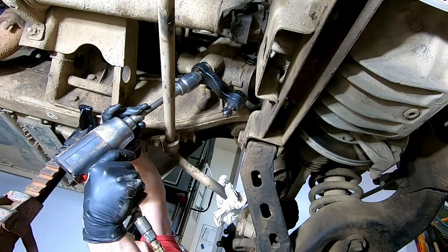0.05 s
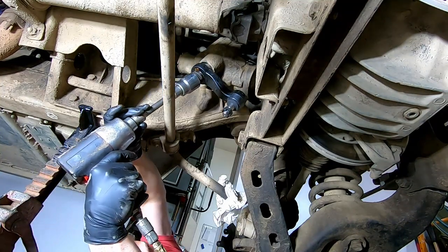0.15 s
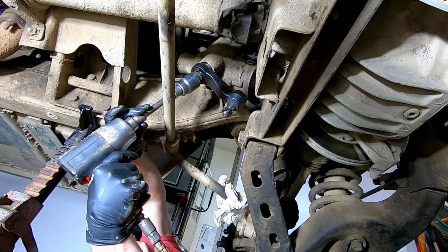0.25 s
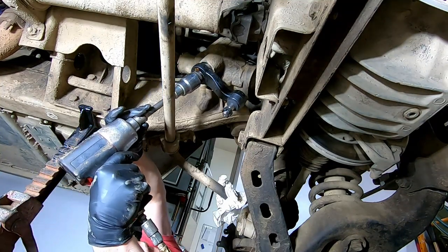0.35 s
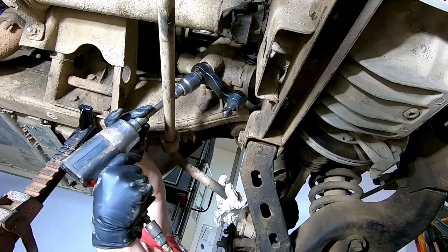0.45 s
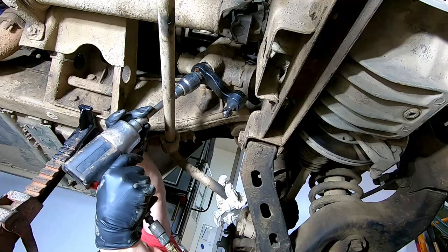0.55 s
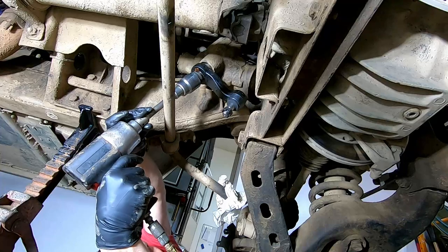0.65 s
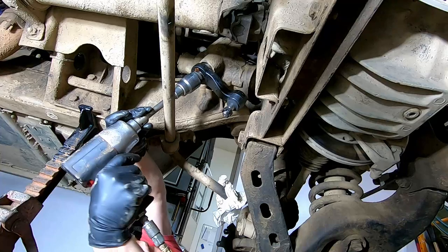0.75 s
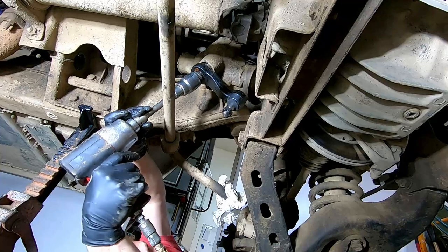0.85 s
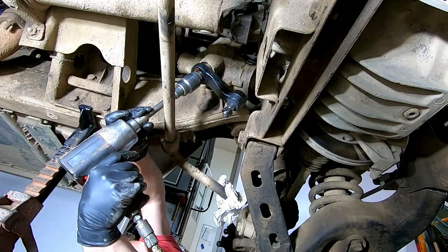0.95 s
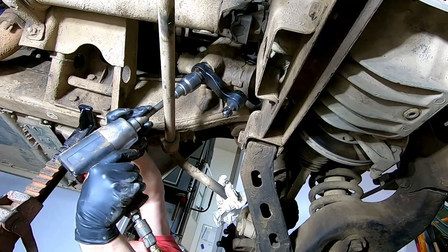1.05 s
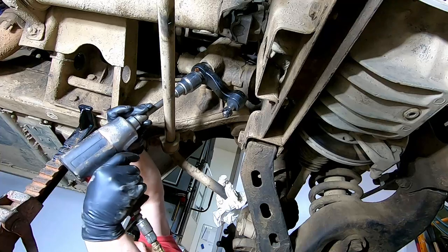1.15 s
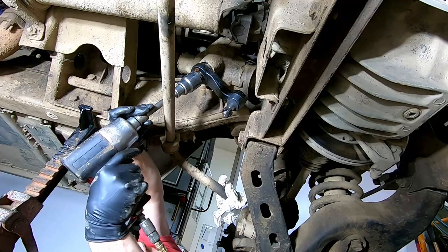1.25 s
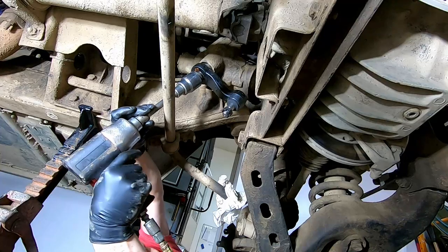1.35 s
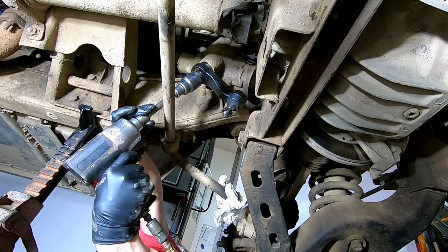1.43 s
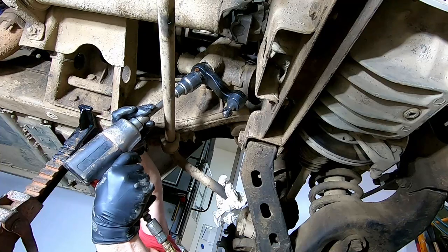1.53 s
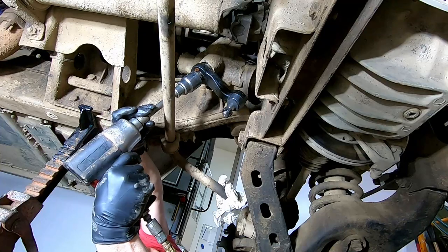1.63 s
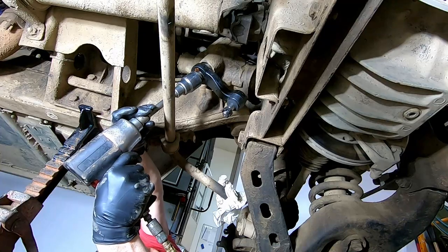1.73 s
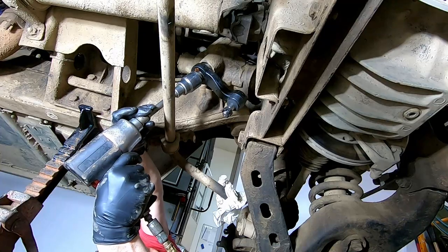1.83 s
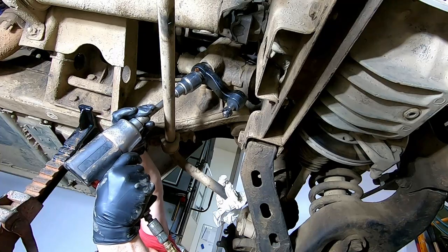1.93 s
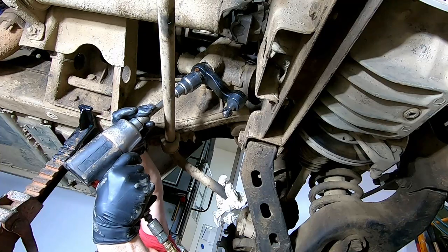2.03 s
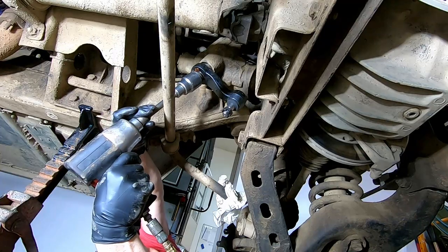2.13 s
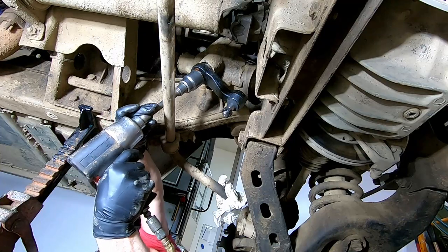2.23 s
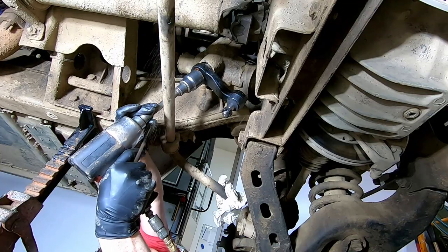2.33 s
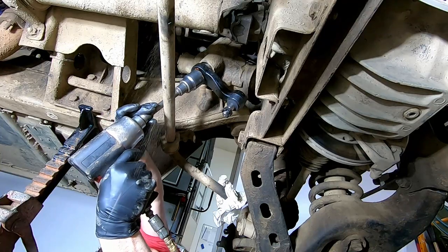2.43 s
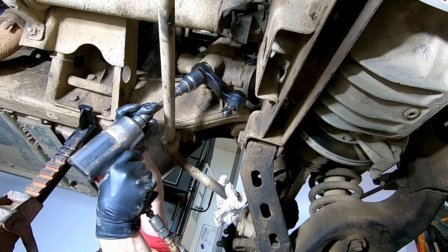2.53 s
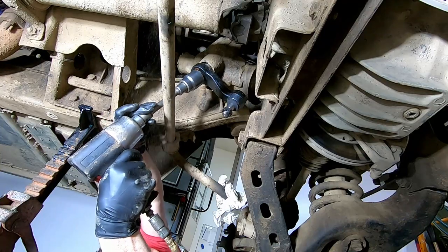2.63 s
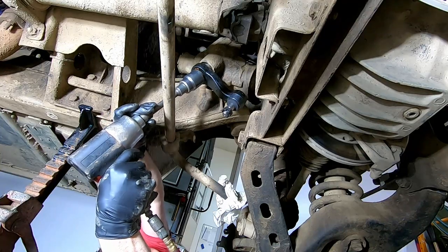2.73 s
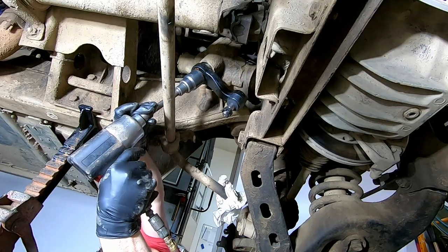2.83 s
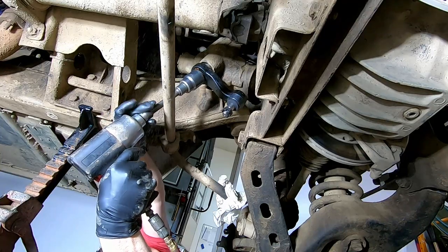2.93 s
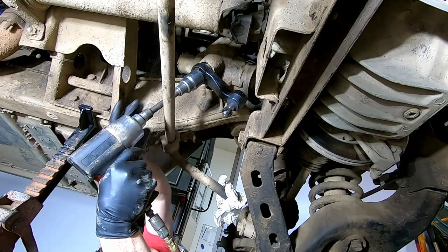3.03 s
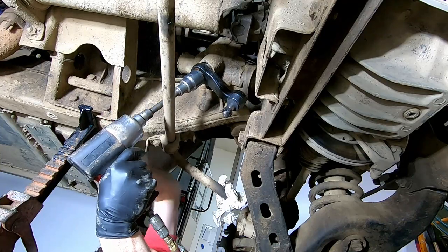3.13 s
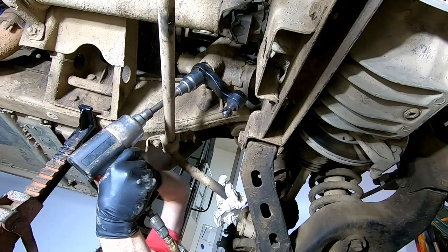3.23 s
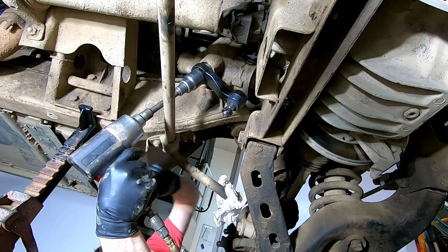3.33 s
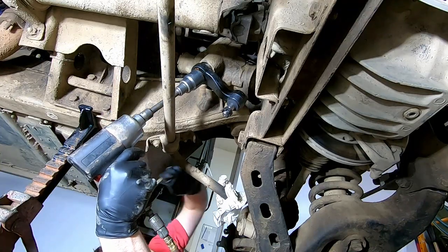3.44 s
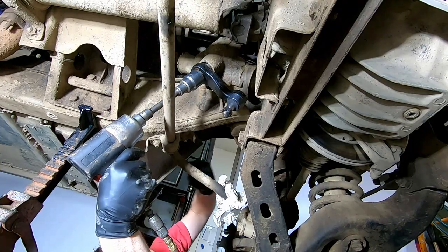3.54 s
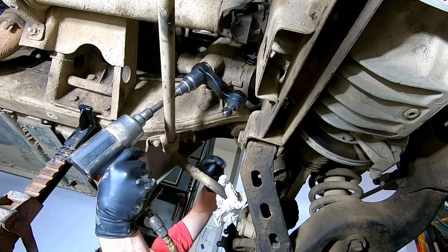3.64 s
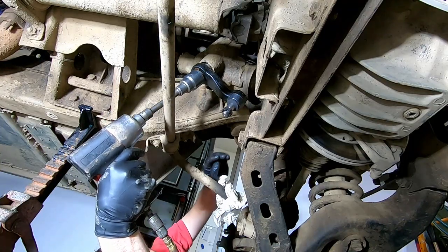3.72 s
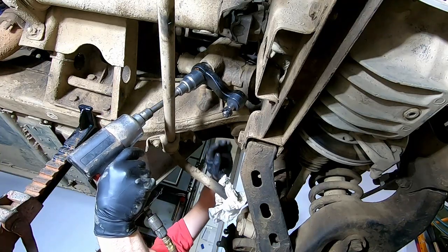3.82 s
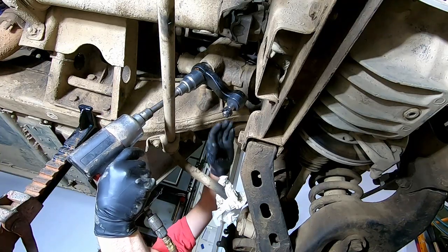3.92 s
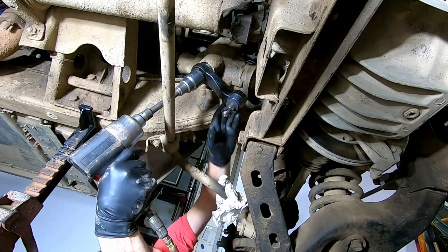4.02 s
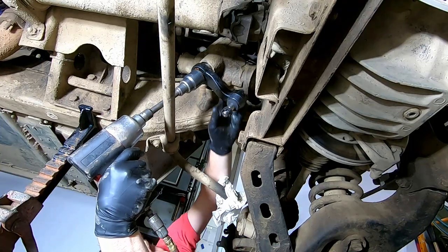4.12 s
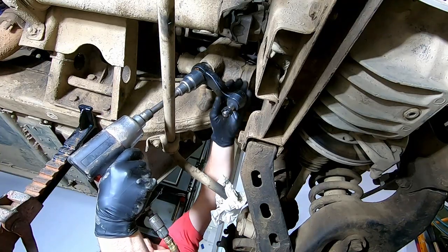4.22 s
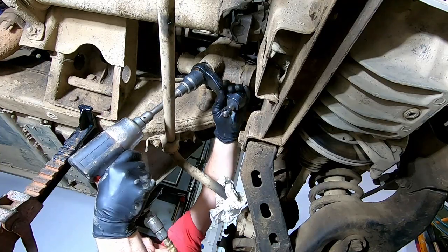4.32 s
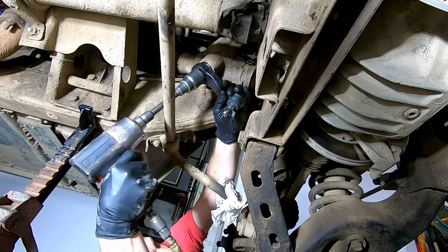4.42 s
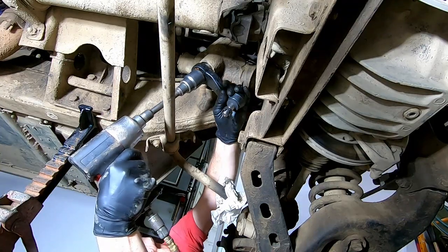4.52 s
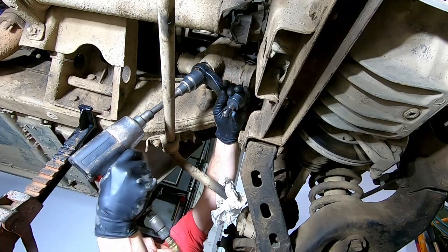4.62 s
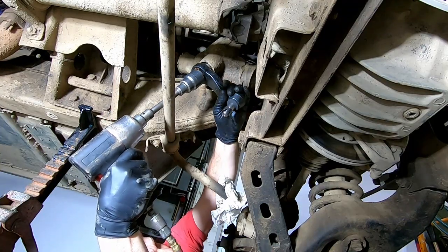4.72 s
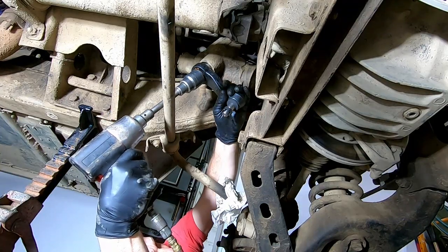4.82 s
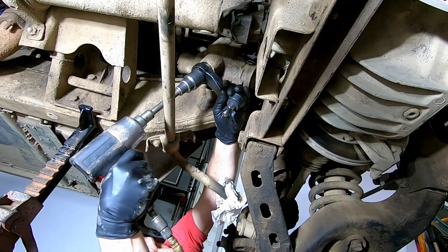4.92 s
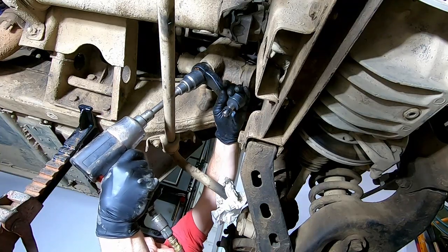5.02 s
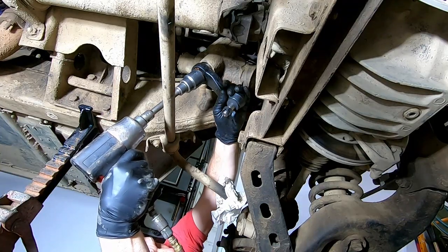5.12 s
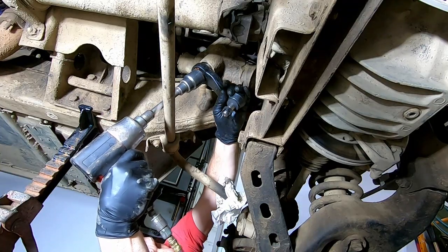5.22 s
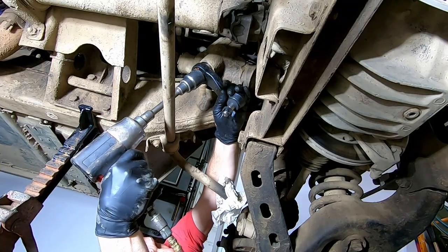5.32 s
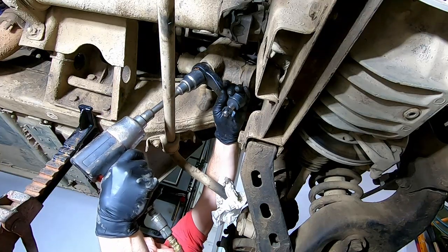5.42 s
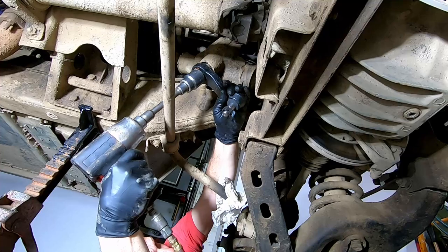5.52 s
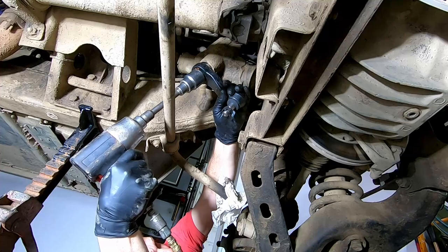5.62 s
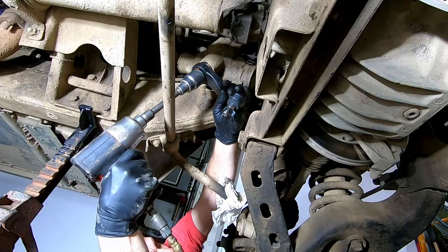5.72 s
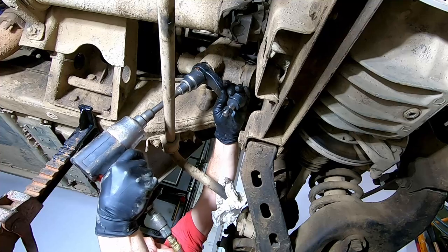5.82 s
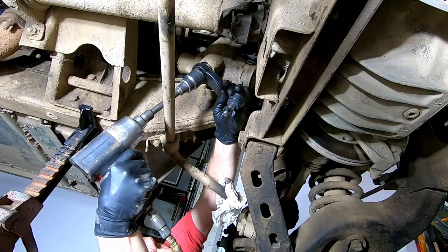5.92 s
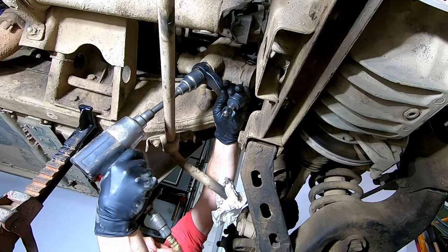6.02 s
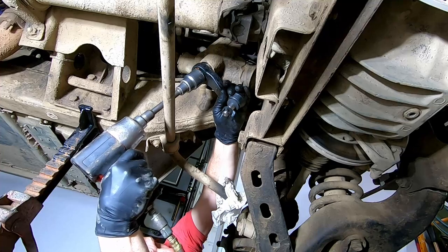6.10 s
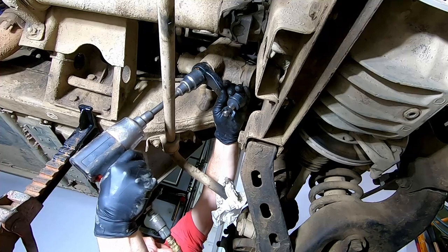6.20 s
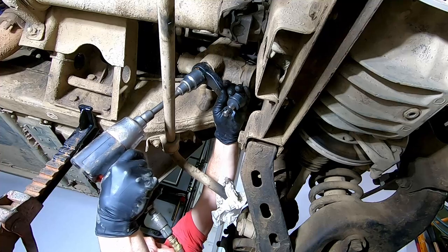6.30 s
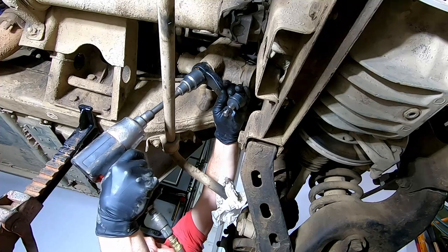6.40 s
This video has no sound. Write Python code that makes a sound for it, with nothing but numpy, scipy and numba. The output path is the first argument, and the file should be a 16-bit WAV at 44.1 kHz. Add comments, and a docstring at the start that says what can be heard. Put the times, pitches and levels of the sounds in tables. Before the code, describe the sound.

A phone close under a vehicle in a live workshop picks up a steady, bright hiss from an air hose coupling over a faint low murmur. From 0 to 1.5 s, extra air seeps from the trigger while gloves and hose rub and rustle in short bumps, with light steel taps near 0.1, 0.5 and 0.65 s. Around 1.6 s the valve whistles and the air impact wrench gives a weak puff with two loose clanks. A second pull builds from clunks at 2.0 s to hard rapid blows by 2.2 s; a third snaps out at 2.6-2.8 s. The reverberation fades and the hiss creeps up again, with a tiny tap at 3.65 s. At 4.25 s a whistle opens a long run: rough air roar, low rumble, exhaust thumps and ringing steel cracks, about thirteen a second, still hammering at the end near 6.45 s.

```python
"""In a workshop, an air impact wrench works a nut under a truck, close to a phone; its hose coupling hisses.
After some rubbing and rustling come three short pulls of the trigger, then a long one.
Coloured noise makes the air, rumble and rubbing; fading sine waves make the ringing steel and exhaust thumps.
The chassis and workshop smear the sound, and the phone's automatic gain creeps back up in the quiet."""
import sys
import numpy as np
from scipy import signal
from scipy.fft import rfft, irfft, next_fast_len
from scipy.io import wavfile
from scipy.ndimage import uniform_filter1d
from numba import njit

SR = 44100
rng = np.random.default_rng(int(sys.argv[2]) if len(sys.argv) > 2 else 0)


def waveform_to_disk(signal):
    """Save audio, clipped to [-1, 1], as 16-bit WAV at the path in sys.argv[1]."""
    frames = np.transpose(np.atleast_2d(signal))
    scaled = np.clip(frames, -1, 1) * 32767
    samples = np.round(scaled).astype(np.int16)
    wavfile.write(sys.argv[1], SR, samples)


N = 284886  # length of the scene in samples

# Hiss of the leaking coupling. Each row: frequency in Hz, relative level in dB.
LEAK_SPECTRUM = [(240, -77), (400, -25), (527, -35), (1340, -19.5), (1740, -22), (2060, -13.5), (2840, -7),
                 (3210, -16), (3580, -7), (4110, -15), (4860, -8.5), (5750, -10), (7470, -3.5),
                 (9840, -11.5), (15600, -23)]
# Narrow resonances of the coupling. Each row: frequency in Hz, width in Hz, lift in dB.
COUPLING_RINGS = [(3900, 60, 3.3), (6630, 40, 12), (7470, 84, 2.7), (7700, 90, 4), (9600, 300, 10),
                  (10080, 140, 14)]
# Low murmur of the workshop. Each row: frequency in Hz, relative level in dB.
SHOP_SPECTRUM = [(18, -75), (30, -48), (106, -11.5), (142, -15), (188, 0.5), (265, -1.5), (337, -7),
                 (372, -33), (900, -54), (1170, -70.5), (1980, -120)]
LEAK_DB, SHOP_DB = -47.5, -65.5

# Air seeping past the half-pressed trigger. Each row: frequency in Hz, relative level in dB.
SEEP_SPECTRUM = [(600, -37), (1000, -15), (1800, -10.5), (2600, -0.5), (3600, -5), (4600, -7),
                 (5400, -12.5), (6500, -4), (8000, -5), (12000, -23)]
# Resonances of the seeping air. Each row: frequency in Hz, width in Hz, lift in dB.
SEEP_RINGS = [(750, 41, 23), (1900, 50, 7.8), (2370, 47, 11), (2695, 39, 10.3), (2940, 55, 7.2),
              (5450, 100, 11), (6300, 140, 3.3)]
SEEP_DB, SEEP_END_S = -49.5, 1.8

# Gloves and hose shifting on the frame. Each row: peak in seconds, rub level in dB, rustle level in dB.
HANDLING = [(.05, -61, -56.5), (.176, -55, -67), (.478, -51, -55), (.664, -48.5, -66), (.85, -76, -71),
            (.992, -73, -63.5), (1.118, -53, -59.5), (1.436, -55.5, -65)]
# Low rubbing. Each row: frequency in Hz, relative level in dB.
RUB_SPECTRUM = [(40, -16), (110, -40), (150, -3), (250, 0), (380, -10.5), (600, -34)]
# Brighter rustle. Each row: frequency in Hz, relative level in dB.
RUSTLE_SPECTRUM = [(250, -25), (420, 0.5), (600, -6), (1000, -4), (1700, -21), (3000, -24)]
# Resonance of the rustle. Each row: frequency in Hz, width in Hz, lift in dB.
RUSTLE_RINGS = [(721, 19, 12.5)]
SHIFT_RISE_DB_S, RUB_FALL_DB_S, RUSTLE_FALL_DB_S = 450, 134, 125

# The socket tapping the frame. Each row: start in seconds, base level in dB, lowest ring in Hz.
KNOCKS = [(0.074, -42.5, 862), (0.46, -53, 735), (0.495, -45, 1010), (0.657, -47, 250), (3.645, -52, 2100)]
# Rings in every tap. Each row: multiple of the lowest ring, change from the base level in dB.
KNOCK_MODES = [(1, 2.5), (1.6, 0.5), (2.25, -10)]

# How the workshop rings on. Each row: upper band edge in Hz, time to fade by 60 dB in seconds, relative level in dB.
ROOM_BANDS = [(131, 1.15, -2), (396, 0.58, -4), (1890, 0.71, 5), (5900, 0.88, -4.5), (9100, 0.83, 0),
              (20000, 0.78, 0)]
# Strength of the workshop, then what the hands and the blows send into it, compared with the air.
# Hands work close to the phone; blows under the chassis reach the workshop weaker than the exhaust.
ROOM_DB, HANDS_ROOM_DB, BLOWS_ROOM_DB = -6.5, -6, -5.5

# Air let through by the trigger, one list per curve. Each row: time in seconds, base exhaust air level in dB.
PULLS = [
    [(1.55, -60), (1.602, -46), (1.65, -38.5), (1.72, -34), (1.85, -59.5)],
    [(1.85, -58), (1.978, -42.5), (2.03, -39.5), (2.06, -33.5), (2.2, -21.5), (2.242, -25.5), (2.28, -32.5)],
    [(2.55, -59), (2.582, -26.5), (2.6, -25), (2.738, -26), (2.77, -26), (2.79, -32)],
    [(4.25, -60), (4.28, -31.5), (4.3, -25.5), (4.46, -24.5), (5.06, -28.5), (5.87, -25.5), (6.46, -23.5)],
]
# One turn, stalled by the blow. Each row: share of the turn, air rush change in dB, rumble change in dB.
TURN = [(0, 2, -10.5), (.15, 3.5, -0.5), (.4, 1.5, 0), (.66, 4.5, 2.5), (.85, 4.5, -7), (1, 3, 1.5)]
# Escaping exhaust air. Each row: frequency in Hz, relative level in dB.
AIR_SPECTRUM = [(180, -12), (300, -3), (384, -15), (432, -9), (581, -7.5), (1310, -7.5), (1540, -10),
                (2070, -7), (4020, -9), (7530, -12), (9030, -18), (10300, -15), (11600, -33),
                (13900, -28.5), (15600, -74)]
# Resonances of the tool body. Each row: frequency in Hz, width in Hz, lift in dB (negative is a dip).
BODY_RINGS = [(737, 81, 3.5), (1333, 28, 3.5), (1690, 80, -3.5), (2180, 70, 5.5), (2486, 20, 6.5),
              (2790, 53, 6.5), (3043, 35, 6), (3380, 36, 9.5), (4540, 66, 7.5), (5000, 44, 4)]
# Rumble of the motor vanes. Each row: frequency in Hz, relative level in dB.
RUMBLE_SPECTRUM = [(25, -26), (50, -10), (80, -1.5), (120, -4.5), (175, -0.5), (215, 0.5), (265, -8),
                   (330, -11), (500, -12.5), (900, -51)]
# The rumble follows the air late and grows faster than it; its level is for FULL_AIR_DB of air.
FULL_AIR_DB = -25
SPIN_UP_S, RUMBLE_DB, RUMBLE_SLOPE = 0.028, -20.5, 1.45

# The valve whistling as it cracks open. Each row: peak in seconds, level in dB.
WHISTLES = [(1.586, -34.5), (2.58, -41), (4.262, -34)]
WHISTLE_RISE_DB_S, WHISTLE_FALL_DB_S = 2500, 400
WHISTLE_DB = -23  # steady whistle compared with the trigger's air level

# Air squeezed through the narrow valve. Each row: frequency in Hz, width in Hz, lift in dB.
THROTTLED_RINGS = [(1090, 60, 0), (2460, 89, 14), (2880, 70, 10.5), (5340, 100, 15)]
THROTTLED_DB, THROTTLED_TOP_DB = 5.5, -35  # level above the trigger's air, highest level

# Hammer blows. Each row: start in seconds, base crack level in dB, extra level of the socket clank in dB.
BLOWS = [(1.676, -22, 6.5), (1.7594, -22, 3.5), (2.0005, -32.5, 13), (2.0544, -33.5, 17),
         (2.0981, -24, -18), (2.154, -9, -22), (2.2031, -7.5, -27), (2.2365, -5.5, -21),
         (2.2535, -6.5, -34), (2.5993, -14, -13), (2.644, -7.5, -29), (2.6993, -5.5, -29),
         (2.742, -11.5, -22), (2.7638, -8, -13), (4.2931, -17.5, -27), (4.3167, -22, -24), (4.341, -8, -21),
         (4.3897, -8.5, -30), (4.454, -4, -10), (4.5163, -4.5, -8), (4.588, -5.5, -16), (4.6606, -5, -6.5),
         (4.7314, -8.5, -4), (4.8107, -6, -11), (4.8809, -8, -21), (4.9594, -10, -20), (5.033, -8, -6),
         (5.1118, -7, -20), (5.1846, -8.5, -6), (5.2627, -9.5, -6), (5.3391, -8, -15), (5.4141, -10, -6),
         (5.4935, -7.5, -19), (5.5719, -7.5, -5.5), (5.6481, -7, -7), (5.7211, -7.5, -22),
         (5.7967, -5.5, -15), (5.8704, -4, -27), (5.9464, -6.5, -8), (6.0222, -4.5, -21), (6.096, -4, -8),
         (6.1729, -5.5, -16), (6.2483, -6, -15), (6.3239, -4, -12), (6.3982, -4, -26)]
# Anvil, extension and socket. Each row: usual frequency in Hz, relative level in dB,
# time to fade by 60 dB in seconds.
STEEL_MODES = [(1081, 0.5, 0.084), (1314, 1, 0.058), (1820, -5, 0.044), (2117, -9, 0.076),
               (2667, -8, 0.045), (3130, -8, 0.032), (3460, -6.5, 0.058), (4340, -1, 0.018),
               (4760, -5.5, 0.04), (5680, -8, 0.028), (6930, -7, 0.044), (10060, -8, 0.02)]
CLANK_HZ = 1500  # steel modes below this belong to the loose socket
LONGEST_TURN_S = 0.088

# Exhaust thumps after a blow. Each row: delay in seconds, added delay as a share of the turn,
# frequency in Hz, relative level in dB, time to fade by 60 dB in seconds, rise in seconds.
THUMPS = [(.005, 0, 265.2, 0.5, 0.1, 0.0034), (0.0017, .48, 176.8, -1.5, 0.067, 0.0015),
          (0.0026, .46, 550, -14, 0.019, 0.0011), (0.0011, 0.264, 86, -8, 0.16, 0.0061)]
# The first thump follows the crack's base level; later ones follow the air, with this level for FULL_AIR_DB.
FIRST_THUMP_DB, LATER_THUMP_DB, THUMP_SLOPE = -3, -10, 1.02

# Stereo width from two microphone ports. Each row: frequency in Hz, gain of the side signal in dB.
WIDTH = [(60, -14), (110, -17), (200, -22), (380, -14.5), (700, -4), (1290, -5.5), (2380, -7), (4400, -8),
         (8120, 1.5), (15000, -1.5)]
# Stereo lean. Each row: frequency in Hz, left gain minus right gain in dB.
LEAN = [(300, -0.5), (700, -1.5), (1300, -1.5), (2400, 1), (4400, -1), (6000, -5.5), (8000, -2.5),
        (10000, 6), (15000, 2.5)]
BASS_HZ, TOP_HZ = 43.5, 15680  # lower and upper limits of the phone
# Automatic gain: highest lift, loudness it aims for, share of the error it corrects, then its speeds.
BOOST_DB, AIM_DB, SQUEEZE, ATTACK_S, RECOVER_DB_S = 8, -20, 0.66, 0.035, 10.5


def from_db(db):
    """Turn decibels into a multiplier."""
    return 10 ** (np.asarray(db) / 20)


def unit(x):
    """Scale a sound to an average (RMS) level of one."""
    return x / np.sqrt(np.mean(x ** 2))


def colour(x, points, peaks=()):
    """Filter a sound by a curve of levels plus narrow resonances."""
    hz, db = np.transpose(points)
    size = next_fast_len(len(x) + SR // 4)
    f = np.arange(size // 2 + 1) * SR / size + 1  # one Hz up, so that the logarithm works
    lift_db = sum(peak_db / (1 + (2 * (f - peak_hz) / width) ** 2) for peak_hz, width, peak_db in peaks)
    curve_db = np.interp(np.log(f), np.log(hz), db)
    return irfft(rfft(x, size) * from_db(curve_db + lift_db), size)[:len(x)]


def noise(points, peaks=()):
    """Random hiss with a chosen colour and an average level of one."""
    return unit(colour(rng.standard_normal(N), points, peaks))


def band(x, lo_hz, hi_hz):
    """Keep the frequencies between two edges."""
    return signal.sosfilt(signal.butter(2, [lo_hz, hi_hz], "band", fs=SR, output="sos"), x)


def walk(rate):
    """Random values, rate of them a second, smoothed twice into a slow drift."""
    hold = int(SR / rate)
    steps = np.repeat(rng.standard_normal(N // hold + 1), hold)
    return uniform_filter1d(uniform_filter1d(steps, hold), hold)[:N]


def tent(s, db, rise_db_s, fall_db_s):
    """Gain that climbs to db at time s and falls away, both at a steady rate in dB."""
    t = np.arange(N) / SR - s
    return from_db(db + np.where(t < 0, rise_db_s * t, -fall_db_s * t))


def ring(hz, t60, rise, phase=0):
    """A sine wave that swells over about rise seconds and fades by 60 dB in t60 seconds."""
    t = np.arange(int(t60 * SR)) / SR
    fade = np.exp(-np.log(1000) * t / t60)
    return (1 - np.exp(-t / rise)) * fade * np.sin(2 * np.pi * hz * t + phase)


def add(out, s, x):
    """Mix a sound into out, starting at time s."""
    i = int(s * SR)
    out[i:i + len(x)] += x[:len(out) - i]


def background():
    """Drifting noise for the leaking coupling, the seeping trigger and the low workshop murmur."""
    before_end = np.arange(N) < SEEP_END_S * SR
    seep = from_db(SEEP_DB + walk(6.1)) * noise(SEEP_SPECTRUM, SEEP_RINGS) * before_end
    leak = from_db(LEAK_DB + 1.1 * walk(4.59)) * noise(LEAK_SPECTRUM, COUPLING_RINGS)
    shop = from_db(SHOP_DB + 2 * walk(7.1)) * noise(SHOP_SPECTRUM)
    return seep + leak + shop


def hands():
    """Friction noise swells and fades as gloves and hose shift; taps set off small rings of steel."""
    rub = sum(tent(s, db, SHIFT_RISE_DB_S, RUB_FALL_DB_S) for s, db, _ in HANDLING)
    rustle = sum(tent(s, db, SHIFT_RISE_DB_S, RUSTLE_FALL_DB_S) for s, _, db in HANDLING)
    out = rub * noise(RUB_SPECTRUM) + rustle * noise(RUSTLE_SPECTRUM, RUSTLE_RINGS)
    for s, db, hz in KNOCKS:
        for multiple, mode_db in KNOCK_MODES:
            add(out, s, from_db(db + mode_db) * ring(hz * multiple, 0.043, 0.00047))
    return out


def chassis(tool):
    """Scatter the tool's sound with a short burst of fading noise, as the metal all round does."""
    t = np.arange(SR // 10) / SR
    scatter = rng.standard_normal(len(t)) * np.exp(-t / 0.022)
    return signal.fftconvolve(tool, scatter / np.linalg.norm(scatter))[:N]


def room():
    """Reflections modelled as noise, each band swelling and then fading at its own rate."""
    t, tail, lo = np.arange(SR) / SR, 0, 20
    swell = 1 - np.exp(-t / 0.051)
    for hi, t60, db in ROOM_BANDS:
        fade = np.exp(-np.log(1000) * t / t60)
        tail = tail + from_db(db) * band(rng.standard_normal(SR), lo, hi) * fade * swell
        lo = hi
    return tail / np.linalg.norm(tail)


def trigger(late_s):
    """Base air level in dB let through by the trigger, late_s seconds ago."""
    t = np.arange(N) / SR - late_s
    return np.max([np.interp(t, *np.transpose(pull), -150, -150) for pull in PULLS], axis=0)


def motor(share):
    """Air rushes out, whistles in the valve and drives rumbling vanes, changing over each turn."""
    part, *cycle = np.transpose(TURN)
    rush_db, stall_db = (np.interp(share, part, c) for c in cycle)
    air_db = trigger(0)
    flow = from_db(air_db)
    air = flow * from_db(rush_db + 3.26 * walk(60)) * noise(AIR_SPECTRUM, BODY_RINGS)

    openings = sum(tent(s, db, WHISTLE_RISE_DB_S, WHISTLE_FALL_DB_S) for s, db in WHISTLES)
    whistle_gain = from_db(WHISTLE_DB) * flow + openings
    whistle = whistle_gain * unit(band(rng.standard_normal(N), 975, 1200))

    rumble_db = RUMBLE_DB + RUMBLE_SLOPE * (trigger(SPIN_UP_S) - FULL_AIR_DB)
    rumble = from_db(rumble_db + stall_db + 2 * walk(25)) * noise(RUMBLE_SPECTRUM)

    throttled_db = np.minimum(air_db + THROTTLED_DB, THROTTLED_TOP_DB)
    throttled = from_db(throttled_db) * noise(SEEP_SPECTRUM, THROTTLED_RINGS)
    return throttled + air + whistle + rumble


def crack(db, clank_db, chance):
    """Steel hits steel: a burst of noise and ringing modes, struck differently every time."""
    t = np.arange(SR // 8) / SR
    chatter = unit(colour(rng.standard_normal(len(t)), AIR_SPECTRUM))
    out = from_db(-3.5) * chatter * (1 - np.exp(-t / 0.0013)) * np.exp(-t / 0.0045)
    for (hz, mode_db, t60), c in zip(STEEL_MODES, chance):
        level_db = mode_db - 8.5 + 2.6 * np.tanh(c[0]) + clank_db * (hz < CLANK_HZ)
        add(out, 0, from_db(level_db) * ring(hz * (1 + 0.0203 * c[1]), t60, 0.0005, c[2]))
    return from_db(db) * out


def hammer():
    """Each blow cracks, the cam clicks later in the turn and the exhaust thumps; also tracks the turn."""
    out, share, air_db = np.zeros(N), np.zeros(N), trigger(0)
    turns = np.minimum(np.diff(np.array(BLOWS)[:, 0], append=N), LONGEST_TURN_S)
    for (s, db, clank_db), turn in zip(BLOWS, turns):
        chance = rng.standard_normal((3, len(STEEL_MODES), 3))
        add(out, s, crack(db, clank_db, chance[0]))
        add(out, s + 0.7 * turn, crack(db - 13, clank_db, chance[1]))  # the cam's lighter click
        later_db = LATER_THUMP_DB + THUMP_SLOPE * (air_db[int(s * SR)] - FULL_AIR_DB)
        for (delay, part, hz, thump_db, t60, rise), c in zip(THUMPS, chance[2]):
            base_db = later_db if part else db + FIRST_THUMP_DB
            start = s + delay + part * turn + 0.00062 * c[0]
            add(out, start, from_db(base_db + thump_db + c[1]) * ring(hz, t60, rise))
        add(share, s, np.linspace(0, 1, int(turn * SR)))
    return out, share


def scene():
    """Mix the tool, hands, background and workshop, then spread them over two channels."""
    blows, share = hammer()
    air, gloves = motor(share), hands()
    tool = blows + air + gloves
    to_room = from_db(BLOWS_ROOM_DB) * blows + air + from_db(HANDS_ROOM_DB) * gloves

    def surround(direct):
        """Add fresh background noise and workshop reflections."""
        reflections = signal.fftconvolve(to_room, room())[:N]
        return direct + background() + from_db(ROOM_DB) * reflections

    scattered = chassis(tool)  # the part that differs between the two ports
    mid = surround(tool)
    side = colour(surround(scattered), WIDTH)
    left, right = (colour(mid + ear * side, [(hz, ear * db / 2) for hz, db in LEAN]) for ear in (1, -1))
    return np.array([left, right])


@njit
def follow(want_db, start_db, attack, recover_db):
    """Gain drops quickly towards what loud sound asks for and climbs back at a steady rate."""
    out, g = np.empty(len(want_db)), start_db
    for i in range(len(want_db)):
        if want_db[i] < g:
            g = g + attack * (want_db[i] - g)
        else:
            g = min(want_db[i], g + recover_db)
        out[i] = g
    return out


def record(dry):
    """The microphone loses the deepest bass, automatic gain lifts quiet sound, the top is cut."""
    dry = signal.sosfilt(signal.butter(2, BASS_HZ, "high", fs=SR, output="sos"), dry)
    power = uniform_filter1d(np.mean(dry ** 2, axis=0), size=2000)
    loud_db = 10 * np.log10(power + 1e-12)
    want_db = np.minimum(BOOST_DB, SQUEEZE * (AIM_DB - loud_db))
    gain_db = follow(want_db, float(BOOST_DB), 1 / (ATTACK_S * SR), RECOVER_DB_S / SR)
    top_cut = signal.ellip(12, 0.2, 80, TOP_HZ, fs=SR, output="sos")
    return signal.sosfilt(top_cut, dry * from_db(gain_db))


dry = scene()
out = record(dry)
waveform_to_disk(out)
```